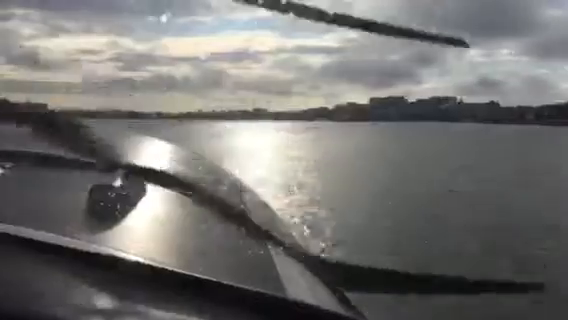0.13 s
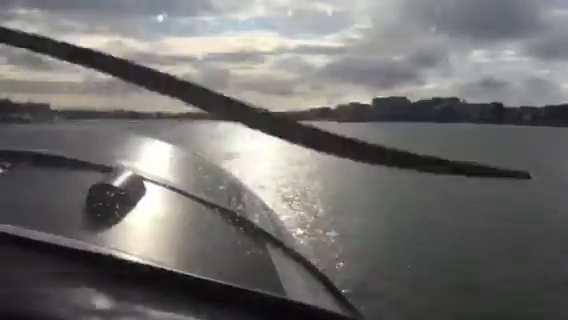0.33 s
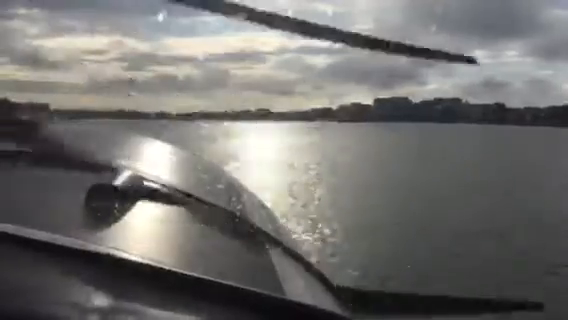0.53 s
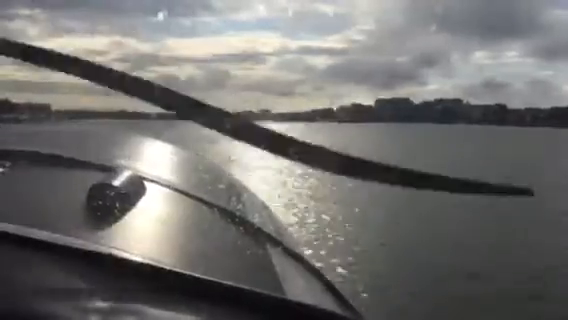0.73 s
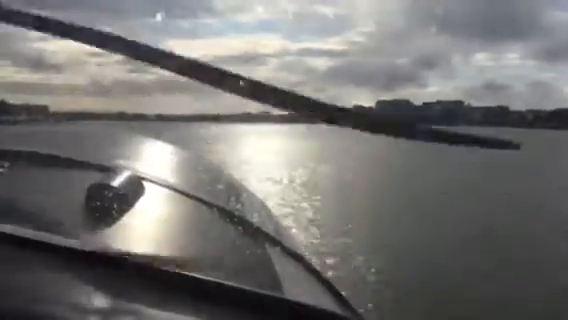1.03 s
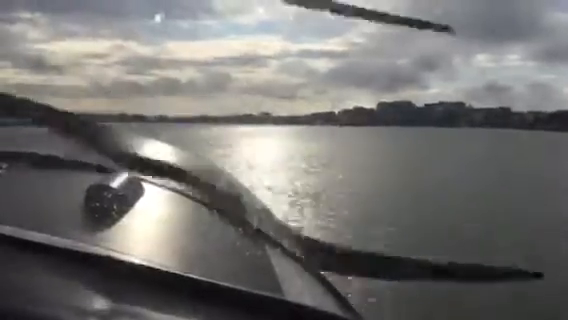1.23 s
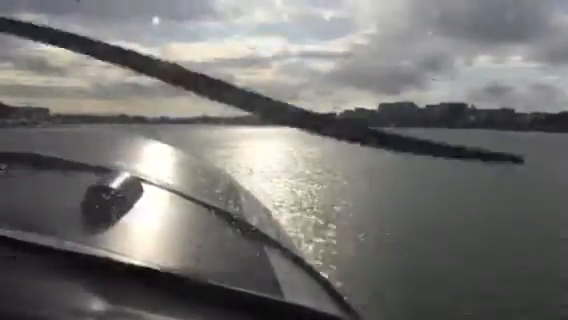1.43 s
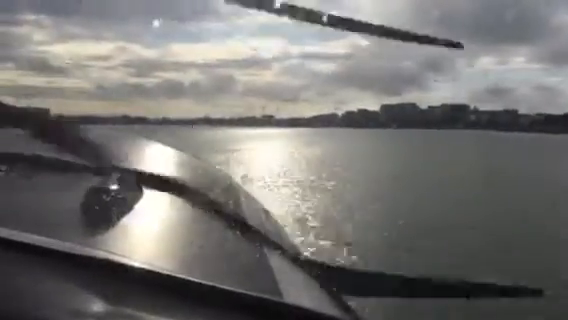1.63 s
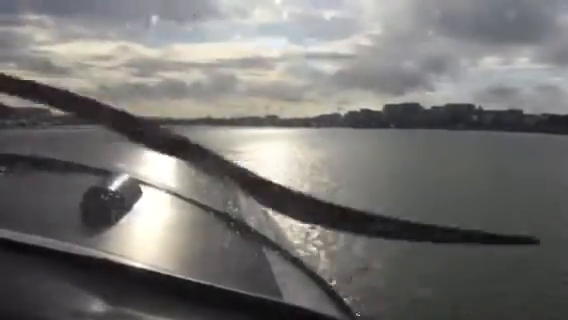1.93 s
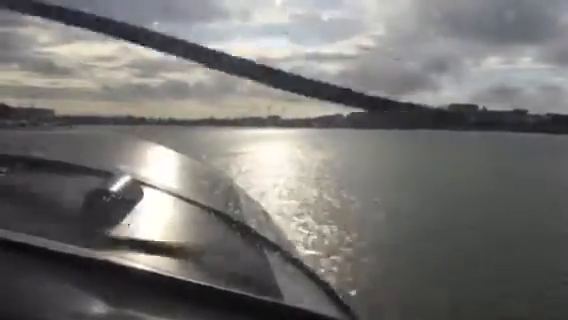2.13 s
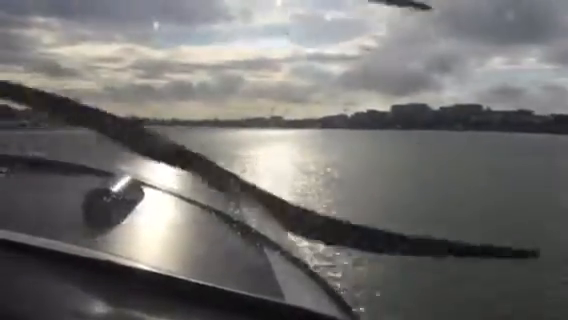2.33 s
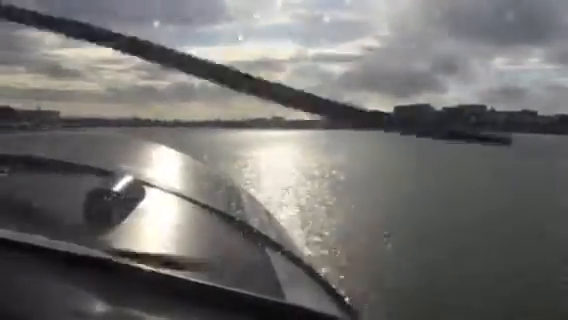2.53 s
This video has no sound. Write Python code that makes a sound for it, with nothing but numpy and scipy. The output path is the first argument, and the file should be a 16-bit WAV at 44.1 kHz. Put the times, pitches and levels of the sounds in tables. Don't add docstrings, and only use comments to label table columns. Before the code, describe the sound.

Loud, unbroken aircraft engine and propeller drone from start to end, thick and low with rapid pulsing, over muffled exhaust rumble and faint wind hiss, captured inside a small seaplane cabin with a small microphone.

```python
import sys
import numpy as np
from scipy import signal
from scipy.io import wavfile

SR = 44100
rng = np.random.default_rng(int(sys.argv[2]) if len(sys.argv) > 2 else 0)


def persist_wave(psi):
    counts = np.round(np.clip(psi, -1, 1) * 32767).astype(np.int16)
    wavfile.write(sys.argv[1], SR, np.atleast_2d(counts).T)


def volts_from_db(level):
    exponent = np.asarray(level, float) / 20
    return 10 ** exponent


N = 118629


def drift(rate_hz):
    step = 40
    settle = 2000
    pole = np.exp(-2 * np.pi * rate_hz * step / SR)
    noise = rng.standard_normal(N // step + settle + 2)
    slow = signal.lfilter([1], [1, -2 * pole, pole ** 2], noise)[settle:]
    slow = (slow - slow.mean()) / slow.std()
    return np.interp(np.arange(N) / step, np.arange(len(slow)), slow)


def bell(x, hz, width_hz, db):
    gain = volts_from_db(db / 2)
    w = 2 * np.pi * hz / SR
    k = np.sin(w) * width_hz / hz / 2
    zeros = [1 + k * gain, -2 * np.cos(w), 1 - k * gain]
    poles = [1 + k / gain, -2 * np.cos(w), 1 - k / gain]
    return signal.lfilter(zeros, poles, x)


def banded_noise(spectrum, patchy_db, rate_hz):
    hz, db_per_hz = np.transpose(spectrum)
    edges = 14 * 2 ** (np.arange(31) / 3)
    edges[-1] *= 1.2
    white = rng.standard_normal((2, N + SR)) * np.sqrt(SR / 2)
    together = drift(rate_hz)
    out = np.zeros(N)
    for k, (low, high) in enumerate(zip(edges[:-1], edges[1:])):
        mid = 14 * 2 ** ((k + .5) / 3) if k < 29 else np.sqrt(low * high)
        if not hz[0] * .5 < mid < hz[-1] * 1.25:
            continue
        sos = signal.butter(2, [low, high], "band", fs=SR, output="sos")
        band = signal.sosfilt(sos, white[k % 2])[SR:]
        level_db = np.interp(np.log(mid), np.log(hz), db_per_hz)
        flicker_db = patchy_db * (.3 * together + drift(rate_hz))
        out += band * volts_from_db(level_db + flicker_db)
    return out


def cycle():
    start_cycles, rate_hz, gain_hz_per_s, wander_rad = .0327, 14.5534, .0039, .005
    t = np.arange(N) / SR
    cycles = start_cycles + rate_hz * t + gain_hz_per_s * t ** 2 / 2
    return 2 * np.pi * cycles + wander_rad * drift(1.54)


# frequency in Hz, level in dB rms.
WHINES = [(1048.2, -59), (4893, -75)]


def whines():
    t = np.arange(N) / SR
    out = np.zeros(N)
    for hz, db in WHINES:
        gain = np.sqrt(2) * volts_from_db(db + 2.8 * drift(2.2))
        out += gain * np.sin(2 * np.pi * hz * t + .67 * drift(2.6))
    return out


# frequency in Hz, level in dB per Hz.
AIR = [(500, -73), (950, -72.5), (1400, -73.5), (2300, -75), (4000, -82.5), (6500, -88.5), (7500, -89.5),
       (15000, -97)]
# frequency in Hz, width in Hz, lift in dB.
PANELS = [(920, 108, 5), (1370, 54, 2), (1700, 84, 2), (2260, 55, -0.5), (3900, 200, 0.5), (6300, 900, 1.5),
          (7400, 700, -1.5), (9330, 900, 2.5)]


def slipstream():
    air = banded_noise(AIR, patchy_db=.3, rate_hz=20)
    for hz, width_hz, db in PANELS:
        air = bell(air, hz, width_hz, db)
    return air


# frequency in Hz, level in dB per Hz.
BOOM = [(30, -65), (58, -50), (165, -49), (250, -62), (330, -56.5), (420, -64.5), (560, -62.5), (750, -78)]


def boom(angle):
    throb, lag_cycles = .12, .25
    swell = 1 + throb * np.cos(angle - 2 * np.pi * lag_cycles)
    noise = banded_noise(BOOM, patchy_db=.44, rate_hz=8) * swell
    ringing = bell(noise, hz=321.4, width_hz=30, db=3)
    return bell(ringing, hz=296, width_hz=20, db=-2)


# multiple of the
# firing cycle, level in dB.
DRONE = [(3, -44.4), (4, -11.3), (5, -15.2), (6, -1.1), (7, -0.0), (8, -9.5), (9, -2.3), (10, -7.5),
         (11, -4.1), (12, -7.1), (13, -12.8), (14, -13.2), (15, -16.3), (16, -11.3), (17, -29.3),
         (18, -25.6), (19, -26.2), (20, -38.7), (21, -24.7), (22, -19.8), (23, -32.3), (24, -37.5),
         (25, -24.3), (26, -30.3), (27, -26.9), (28, -35.4),
         (29, -37.4), (30, -34.3), (31, -35.9), (32, -28.8), (33, -28.8), (34, -37.3), (35, -30.0),
         (36, -32.0), (37, -35.7), (38, -34.9), (39, -31.6), (40, -33.9), (41, -43.0), (42, -41.3),
         (43, -35.3), (44, -35.4), (45, -42.3), (46, -35.9), (47, -39.5), (48, -41.4), (49, -49.7),
         (50, -42.5), (51, -40.6), (52, -45.7)]


def drone(angle):
    reference_db_rms = -20
    blade_order, last_locked, opposed = 4, 22, (13, 17, 21)
    blade_rad, exhaust_rad, scatter_rad = -2.55, -.15, .08
    crank_rad, crank_lead_rad = -2.8, .37
    wobble_db, wobble_hz = .3, 3
    out = np.zeros(N)
    for order, db in DRONE:
        order = int(round(order))
        if order % blade_order == 0:
            phase = blade_rad
        elif order % 2 == 0:
            phase = crank_rad + crank_lead_rad * order
        else:
            phase = exhaust_rad + np.pi * (order in opposed)
        spread_rad = scatter_rad if order <= last_locked else np.pi
        phase += spread_rad * rng.standard_normal()
        level = volts_from_db(db + wobble_db * drift(wobble_hz))
        out += level * np.cos(order * angle + phase)
    return np.sqrt(2) * volts_from_db(reference_db_rms) * out


def scene():
    angle = cycle()
    mix = whines() + slipstream() + boom(angle) + drone(angle)
    return mix[None]


def band_limit(x):
    return signal.sosfilt(signal.butter(12, 15210, fs=SR, output="sos"), x)


def record(dry):
    mix = bell(dry, hz=10370, width_hz=350, db=-5)
    return band_limit(mix)


dry = scene()
out = record(dry)
persist_wave(out)
```